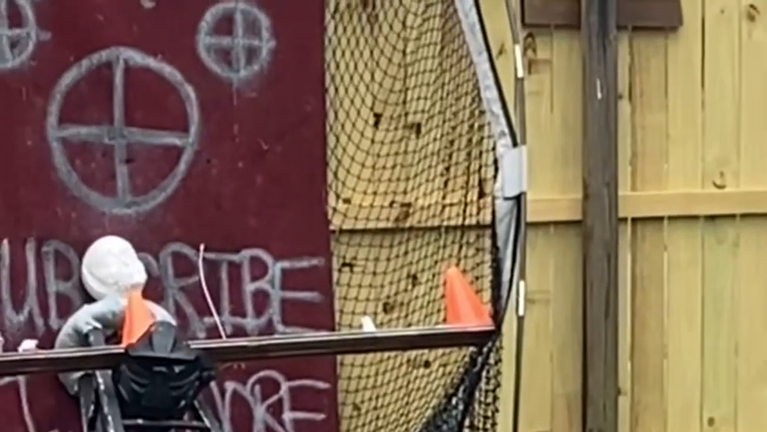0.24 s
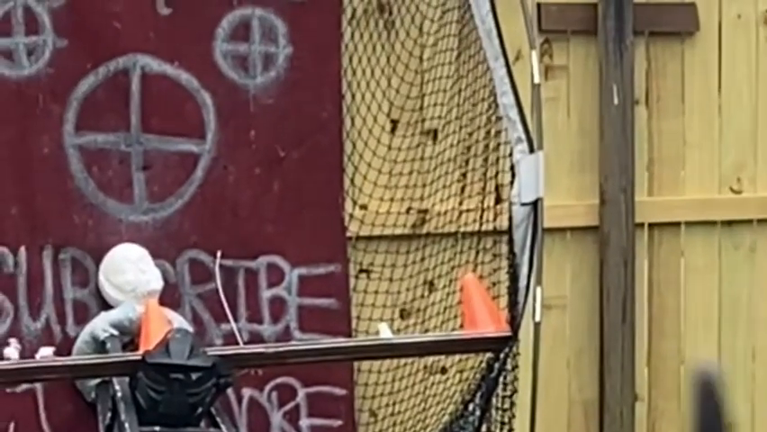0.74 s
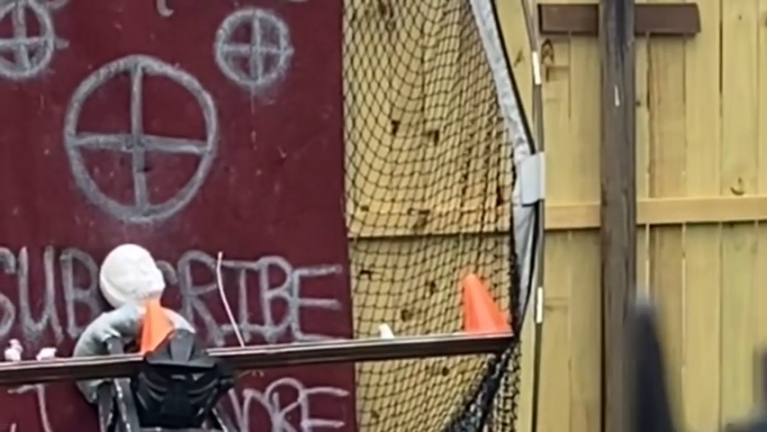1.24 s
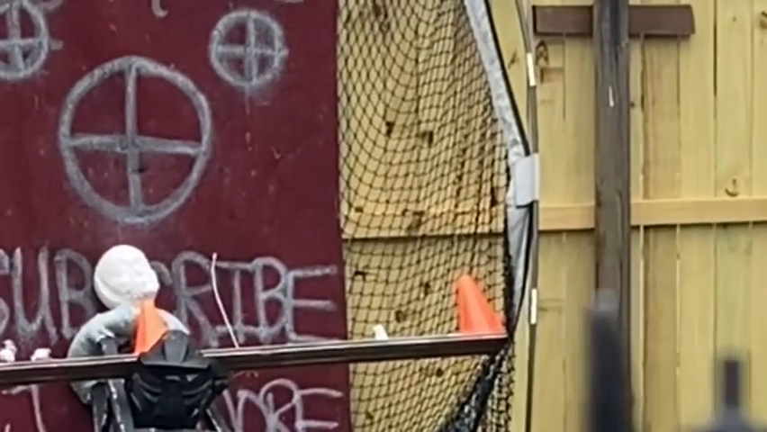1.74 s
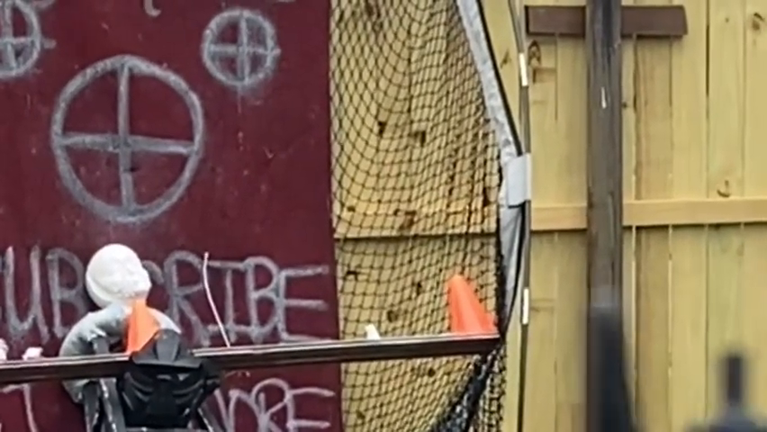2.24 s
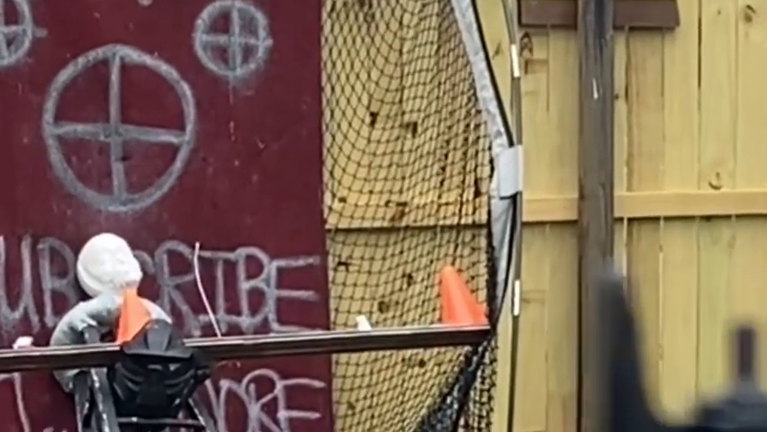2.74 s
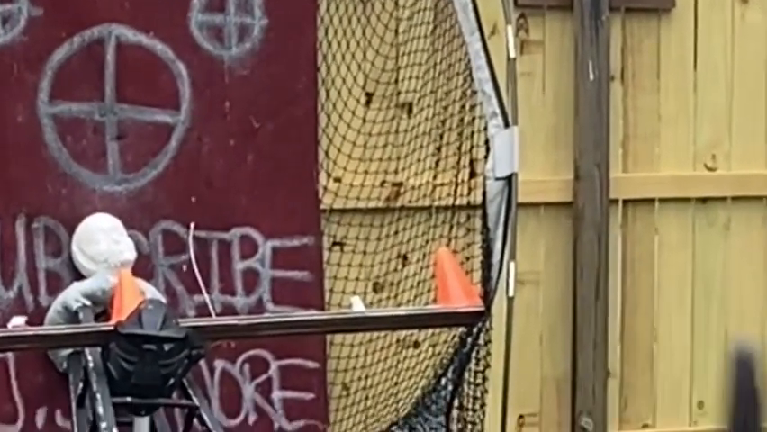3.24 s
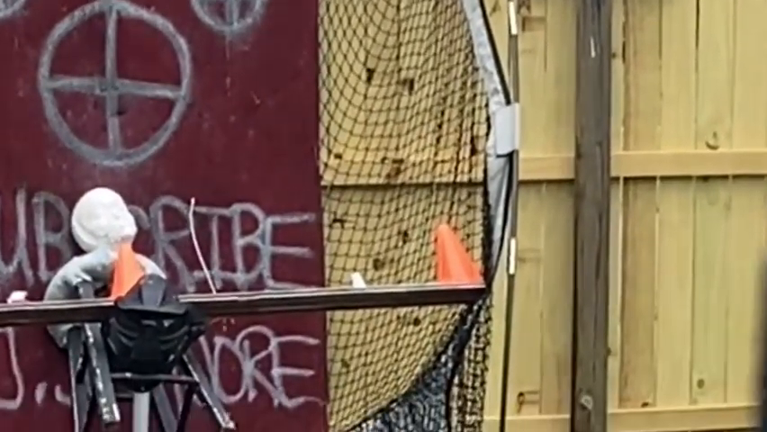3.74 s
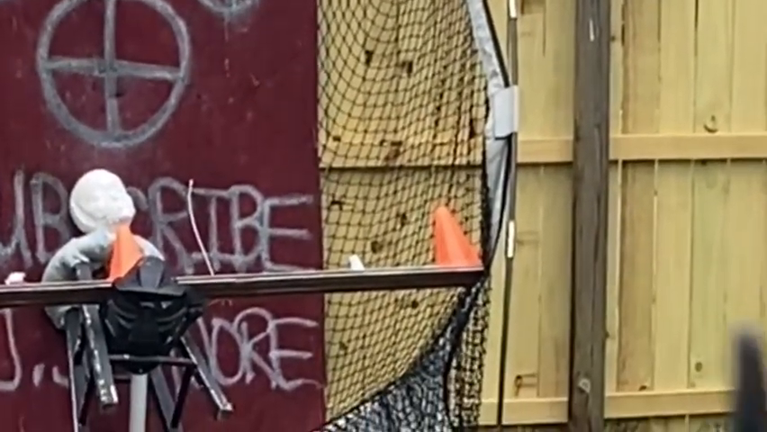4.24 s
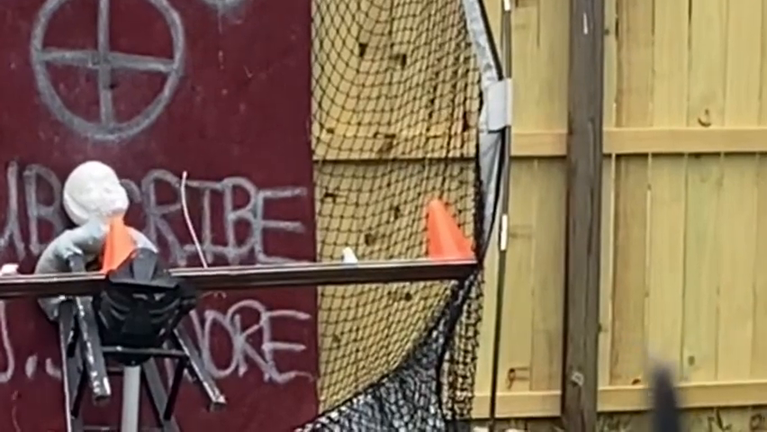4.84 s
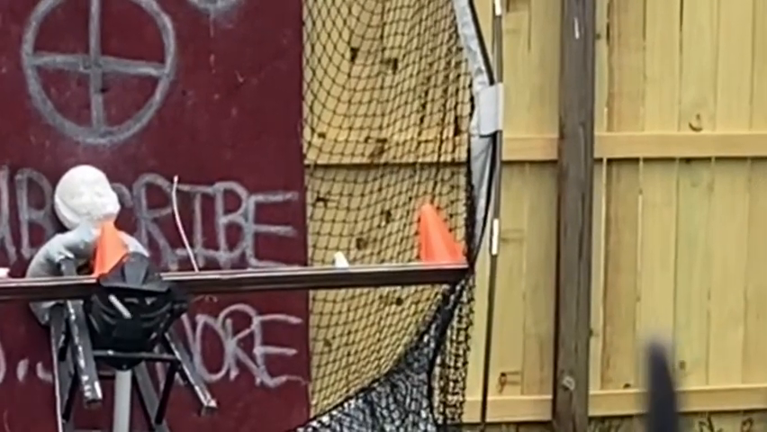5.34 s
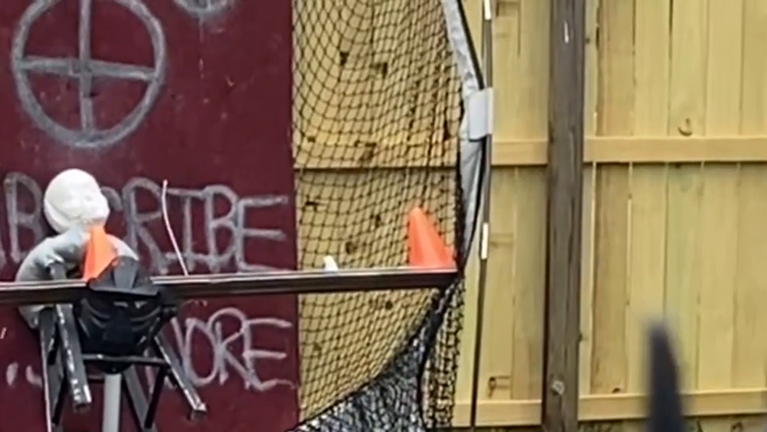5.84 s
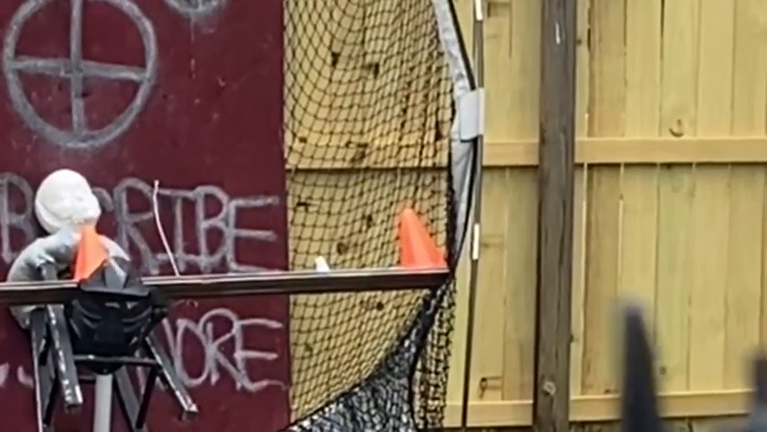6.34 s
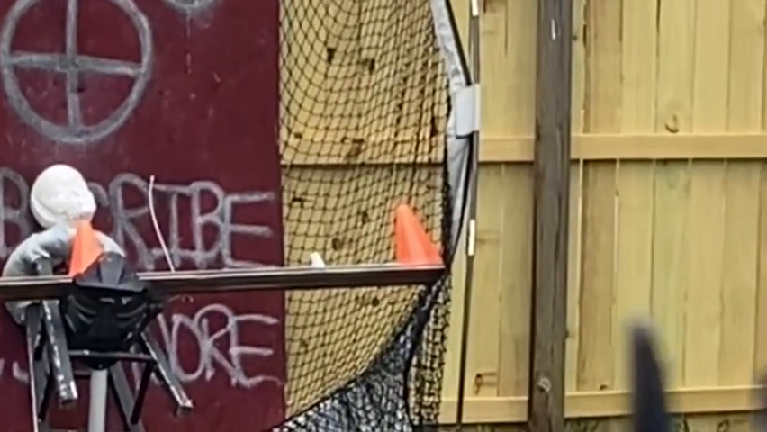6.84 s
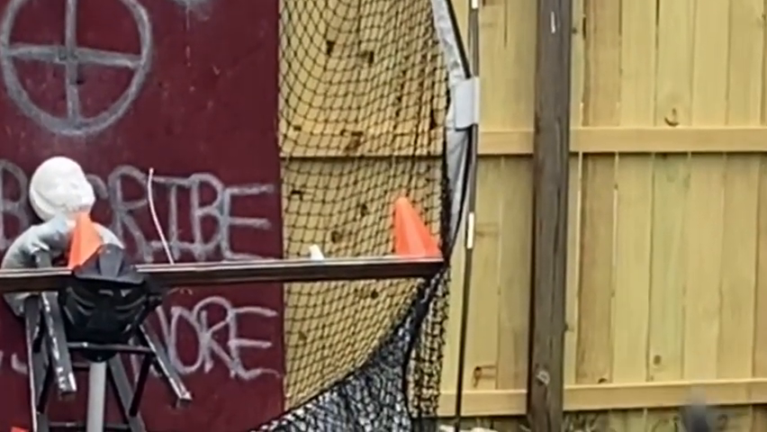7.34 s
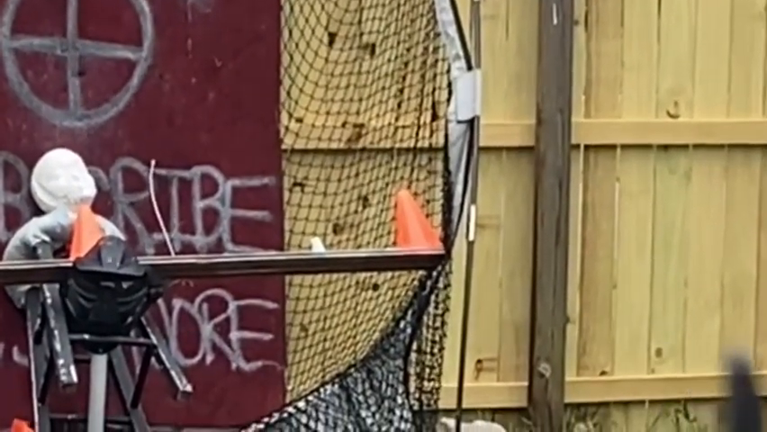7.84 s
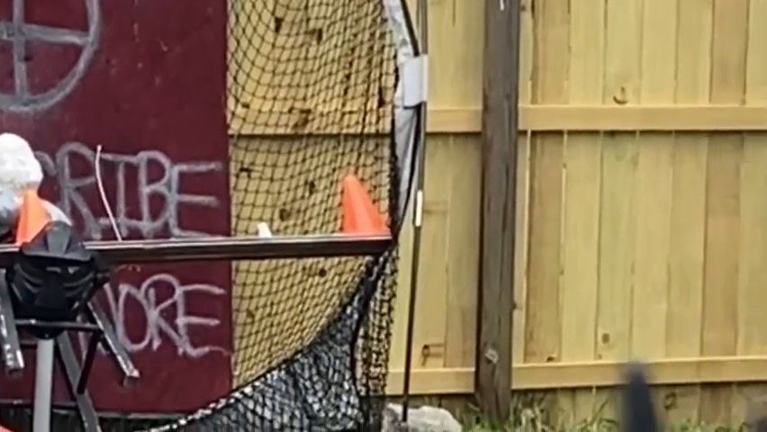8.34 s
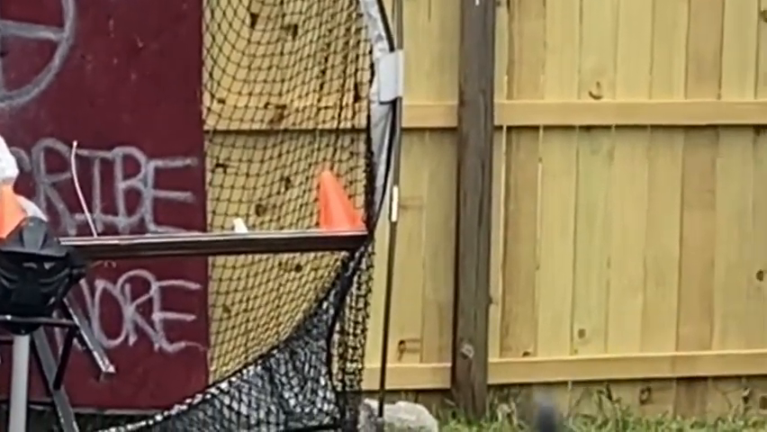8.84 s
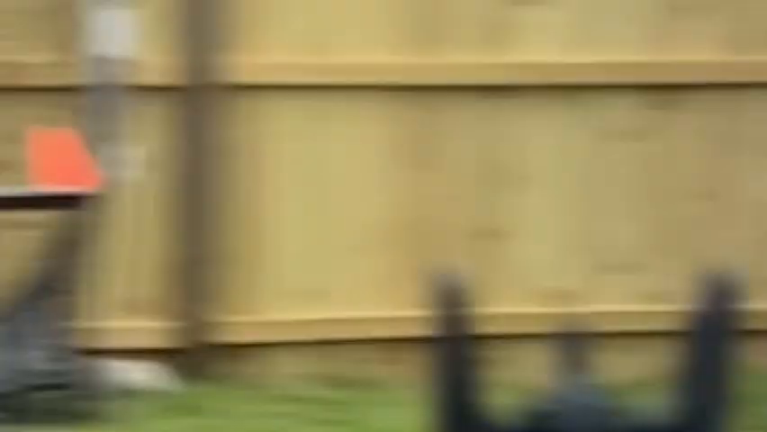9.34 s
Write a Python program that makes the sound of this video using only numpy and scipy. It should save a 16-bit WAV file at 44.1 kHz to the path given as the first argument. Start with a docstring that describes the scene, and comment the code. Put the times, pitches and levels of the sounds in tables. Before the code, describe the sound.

In a fenced backyard, an electric airsoft rifle fires close to a stereo microphone. Six evenly spaced single shots come first, each a short rasping gear whine, hard hollow clack and airy puff, followed by a pellet smack and small bounces. After a pause come three rapid bursts, then four more singles. Trigger clicks and faint handling rustles fill gaps over a barely audible traffic rumble.

```python
"""A town rumbles faintly under rustles and sparse ticks; then an electric airsoft rifle fires close by in a fenced yard.
It fires single shots and three short bursts. A motor spins up a whining, rasping gearbox, made of tones and noise;
on each turn of the gears the spring shoves the body, the piston knocks and the muzzle puffs.
Each pellet smacks the far backstop and bounces twice; these and the trigger clicks are short noisy taps on plastic.
Reflections and two diffuse tails of noise make the yard's echo, heard by a pair of microphones."""
import sys
import numpy as np
from scipy import signal
from scipy.fft import rfft, irfft
from scipy.io import wavfile
from scipy.ndimage import uniform_filter1d

SR = 44100
rng = np.random.default_rng(int(sys.argv[2]) if len(sys.argv) > 2 else 0)


def generate_wav(signal):
    """Clip the signal to [-1, 1] and save it as 16-bit WAV at the path in sys.argv[1]."""
    frames = np.transpose(np.atleast_2d(signal))
    scaled = np.clip(frames, -1, 1) * 32767
    pcm = np.round(scaled).astype(np.int16)
    wavfile.write(sys.argv[1], SR, pcm)


N = 422478
TIME = np.arange(N) / SR  # seconds

# Distant town, its tone colour. Each row: frequency in Hz, relative level in dB.
TOWN_SPECTRUM = [(20, -30.5), (45, -5), (70, 4), (120, 2), (220, -9.5), (400, -12.5), (550, -12.5),
                 (1000, -26.5), (1600, -38.5), (2400, -35), (4000, -45.5), (7000, -43.5), (10000, -58),
                 (16000, -56)]
# Times when the town swells. Each row: loudest moment in seconds, half-width in seconds, dB added.
TOWN_SWELLS = [(.3, 0.96, 6), (2.4, 0.89, 9), (4.75, 0.6, 9)]
TOWN_DB = -71  # before the swells are added
THUD_S = 4.70  # start of the low thud

# Louder rustles as the hands shift on the rifle. Each row: start in seconds, length in seconds, level in dB.
HAND_SHIFTS = [(0, 0.7, -83.5), (3.621, .16, -71), (3.901, .4, -82), (7.49, 0.034, -80.5),
               (8.269, .13, -66)]
FAINT_TICKS_DB = -93.5  # steady level of sparse, very faint random ticks between the louder rustles
# Trigger springing back and loose parts clicking.
# Each row: start in seconds, level in dB before a shared boost, treble tilt in dB per octave, decay in seconds.
TRIGGER_CLICKS = [(.859, -29.5, -8, .004), (.874, -23, .5, .0038), (1.282, -24.5, 1, .0023),
                  (1.451, -41.5, 2.5, .003), (1.485, -49, 3, .0022), (1.677, -25.5, 0.5, .0021),
                  (2.063, -28.5, 0.5, .003), (2.463, -20, 0, .0015), (2.798, -24.5, -2.5, .0035),
                  (3.791, -31, -1, .004), (4.792, -26, 1, .003), (6.425, -41.5, 2.5, .006),
                  (6.912, -38.5, -1, .004), (7.117, -39, 0.5, .0045), (8.259, -42, 2, .006),
                  (8.303, -23.5, 2.5, .0019), (8.644, -23, 2, .0018), (9.002, -27.5, -5, .008),
                  (9.351, -23, 2, .0021)]
# Tone colour of the trigger clicks, ticks and rustles. Each row: frequency in Hz, relative level in dB.
TRIGGER_SPECTRUM = [(150, -30), (700, -4.5), (1000, -4.5), (1800, 2.5), (2700, 3), (3800, 3), (7000, 0),
                    (16000, -2.5)]
CLOSE_ECHO = 0.48  # share (0-1) of the yard's echo carried by the clicks, ticks and rustles

# First pellet of each pull hitting the backstop. Each row: start in seconds, level in dB before SMACK_DB.
BACKSTOP_HITS = [(.842, -25), (1.2375, -33), (1.643, -27), (2.047, -23), (2.399, -26), (2.767, -23),
                 (4.511, -22), (5.263, -39), (6.167, -30), (7.739, -46), (8.602, -24.5), (8.974, -22.5),
                 (9.337, -23)]
# The same pellet coming down after it rebounds. Each row: start in seconds, level in dB before the bounce's own.
PELLET_LANDINGS = [(.929, -30), (1.349, -34.5), (1.751, -27), (2.149, -30.5), (2.506, -24), (2.874, -32),
                   (4.608, -30), (5.364, -37), (6.273, -37.5), (7.832, -28.5), (8.692, -33), (9.071, -38),
                   (9.422, -40)]
# The two bounces. Each row: dB added to the landing, treble tilt in dB per octave, decay in seconds.
PELLET_BOUNCES = [(11.5, 0.5, 0.0041), (-7.5, 1.5, .003)]
# Tone colour of a pellet's impact. Each row: frequency in Hz, relative level in dB.
PELLET_SPECTRUM = [(40, -63), (150, -26), (550, -5), (900, -5.5), (2200, -2), (3000, -1.5), (5500, -4.5),
                   (9000, -11), (16000, -24.5)]
SMACK_DB, SMACK_TILT_DB, SMACK_DECAY_S = 13.5, -2, 0.011  # tilt is per octave
BOUNCE_S = .095  # from the first bounce to the second

# Trigger pulls; a held trigger fires a burst.
# Each row: first shot in seconds, seconds of cocking before it, seconds the motor stays on after it,
# then relative levels in dB: gear whine, gear rasp, muzzle puff, tick of the gear first letting the piston go.
TRIGGER_PULLS = [(.748, .053, 0, 0, 0.5, -.5, -2), (1.1616, .0525, 0, 1.5, 0, -0.5, 4.5),
                 (1.566, .052, 0.0007, -0.5, -1, 0, -8.5), (1.9614, .0525, 0, -1, -.5, -0.85, 1),
                 (2.3217, .053, 0.0015, -1, 0, -1, -3), (2.687, .053, 0.0012, -1, 0.5, -0.5, -3),
                 (4.4256, .054, 0.25, -2, -1, -.5, -20.5), (5.1785, .0395, 0.34, -2, -1, -.5, -12.5),
                 (6.085, .059, .175, -5, -1.5, -0.8, -19), (7.654, .062, 0.004, -9, -3.5, -4.5, -6.5),
                 (8.5124, .0455, 0.0011, -9, -2.5, -3, -7), (8.8899, .055, 0.0017, -7, -2.5, -2.5, -13.5),
                 (9.2451, .053, 0.0038, -6, 1, -1.5, -2)]
# Tone colour of the scraping gears. Each row: frequency in Hz, relative level in dB.
RASP_SPECTRUM = [(100, -37.5), (330, -32), (600, -6.5), (900, -15), (1700, -7), (2300, -6), (2800, -5.5),
                 (3500, -3.5), (4400, -5.5), (5800, -7), (8000, -11), (16000, -17)]
# How well the gearbox shell radiates the tooth tones. Each row: frequency in Hz, gain in dB.
WHINE_GAIN = [(300, -25), (700, -8.5), (1100, -16.5), (1650, -3), (2200, -1), (2850, -5), (3350, 1.5),
              (4000, -14), (5800, -9.5), (8000, -16.5), (16000, -28.5)]
CYCLE_S = .0493  # one turn of the gears at full speed, one shot
START_LAG_S, SPIN_UP_S = .0305, .035  # a turn takes longer while the motor is still gaining speed
COAST_REACH_S, COAST_DRAG = .04, .24  # without power: how far the gears can still turn, and the share they slow by
FREE_S, FREE_COASTING_S = .009, .018  # after a shot the gears spin free this long before they catch the piston
FREE_DB, CATCH_DB, CATCH_DECAY_S = -4.5, 7, 0.0069  # the rasp drops meanwhile, and flares at the catch

# Heavily damped ringing of the cylinder when the piston lands.
# Each row: frequency in Hz, relative level in dB, seconds to the crest.
CYLINDER_MODES = [(900, -28, .001), (1157, -20, .0016), (1480, -33.5, .003), (1950, -19, .0011),
                  (2279, -2.5, 0.0009454), (2446, -9.5, 0.0012043), (3440, -21.5, .0006),
                  (4900, -11, .0007), (5735, -16, .0006)]
# Crack that rides on the knock. Each row: frequency in Hz, relative level in dB.
CRACK_SPECTRUM = [(200, -10.5), (550, 5.5), (1100, 1), (2300, -8), (3600, -1), (6000, -2), (8000, -5),
                  (16000, -8.5)]
SLAM_DB, SLAM_SPREAD_DB = 0.4, .5  # the piston lands nearly alike every time
REFILL_DB = -3.5  # later shots of a burst puff less, as the cylinder has less time to refill
# Hollow plastic body of the rifle. Each row: centre in Hz, width in Hz, dB added or taken away.
BODY_RESONANCES = [(333, 170, 3.5), (670, 180, 0), (800, 30, -1.5), (900, 88, 3), (1125, 81, 5),
                   (1300, 82, -3), (2380, 410, 4.5), (2780, 170, -7), (2890, 80, 4)]

# Separate reflections from the shooter, ground and fence. Each row: delay in seconds, level in dB.
REFLECTIONS = [(.0032, -14), (.0049, -21.5), (.0092, -28), (0.0181, -18), (0.0345, -30.5), (.054, -32.5)]
# Diffuse echo. Each row: frequency in Hz, near walls in dB, far yard in dB,
# seconds for the far yard to fade by 60 dB.
YARD_ECHO = [(80, -27.5, -39, 0.38), (302, -30, -37, 0.39), (700, -14, -23.5, 0.87), (1310, -14, -31.5, 1),
             (2320, -19, -28, 0.62), (3890, -19, -25.5, 0.65), (6000, -13, -26, 0.91),
             (9900, -11, -22, 0.31), (16000, -19, -38, .2)]
# Timing between the two microphones. Each row: frequency in Hz, radians by which left leads.
MIC_LEAD = [(100, -.11), (400, -.3), (950, -.9), (1450, .2), (2000, .5), (2600, 1.15), (3200, .55),
            (3900, .3), (4500, 1.1), (4900, 3.2), (5300, 6.2), (8000, 7.8), (11000, 8.7), (12500, 9.15)]
# Loudness between the two microphones. Each row: frequency in Hz, left minus right in dB.
MIC_BALANCE = [(60, 0.0), (110, -1), (200, -0.5), (380, -1.0), (700, -1.5), (1290, -3.5), (2380, 0.5),
               (4400, 0.5), (8120, 0.0), (15000, 0.0)]
CUTOFF_HZ = 16100  # top of the recorded band


def amp(db):
    """Turns decibels into gain."""
    return 10 ** (np.asarray(db) / 20)


def unit(x):
    """Scales a sound to an rms level of 1."""
    return x / np.sqrt(np.mean(x ** 2) + 1e-20)


def read(points, hz, axis=1):
    """Reads one column of a table, filling in between rows on a log-frequency axis."""
    table = np.transpose(points)
    return np.interp(np.log(hz + 1), np.log(table[0] + 1), table[axis])


def add(mix, s, sound):
    """Mixes a sound in at time s (seconds)."""
    part = mix[max(round(s * SR), 0):][:len(sound)]
    part += sound[:len(part)]


def noise(spectrum, size):
    """Makes noise of rms 1 with the given tone colour."""
    gain = amp(read(spectrum, np.fft.rfftfreq(size, 1 / SR)))
    return unit(irfft(rfft(rng.standard_normal(size)) * gain, size))


def ring(spectrum, tilt_db=0, size=2048):
    """Response of a body to one blow, with energy 1; it sounds only after the blow."""
    hz = abs(np.fft.fftfreq(size, 1 / SR))
    log_gain = np.log(amp(read(spectrum, hz) + tilt_db * np.log2(hz + 800)))
    response = np.fft.ifft(np.exp(signal.hilbert(log_gain).conj())).real
    return response / np.linalg.norm(response)


def chatter(decay, rise=0.00032, size=2048):
    """A train of tiny random contacts that builds and dies, with energy 1."""
    t = np.arange(size) / SR
    envelope = np.exp(-t / max(decay, 1 / SR)) * (1 - np.exp(-(t / rise) ** 2))
    burst = rng.standard_normal(size) * envelope
    return burst / np.linalg.norm(burst)


def tap(spectrum, tilt_db, decay):
    """A small plastic impact: a short chatter heard through the struck body."""
    return signal.fftconvolve(chatter(decay), ring(spectrum, tilt_db))


def town(apart=0.37):
    """Distant traffic rumble, swelling slowly and nearly alike in both ears."""
    swells_db = sum(db * np.exp(-((TIME - s) / width) ** 2) for s, width, db in TOWN_SWELLS)
    shared = noise(TOWN_SPECTRUM, N)
    ears = np.array([shared + apart * noise(TOWN_SPECTRUM, N) for _ in range(2)])
    return amp(TOWN_DB + swells_db) * ears


def bump(thud_hz=48, thud_db=-51):
    """A soft low thud as the first burst stops: one low tone that rises and dies."""
    out, t = np.zeros(N), np.arange(SR // 3) / SR
    age = t / .028  # 1 at the crest of the envelope
    add(out, THUD_S, amp(thud_db) * age * np.exp(1 - age) * np.sin(2 * np.pi * thud_hz * t))
    return out


def ticks_and_rustles(per_s=26, grain_decay=0.0069, count=6):
    """Sparse, very faint random ticks at a steady level, raised to louder rustles while the hands shift."""
    moments = (rng.random((count, N)) < per_s / count / SR) * rng.uniform(0.27, 1, (count, N))
    grains = np.array([tap(TRIGGER_SPECTRUM, tilt_db=-1.5, decay=grain_decay) for _ in range(count)])
    ticks = unit(signal.oaconvolve(moments, grains, axes=1).sum(0)[:N])
    shifts = sum(amp(db) * ((TIME > s) & (TIME < s + length)) for s, length, db in HAND_SHIFTS)
    return (amp(FAINT_TICKS_DB) + uniform_filter1d(shifts, size=800)) * ticks


def clicks(level_db=14):
    """The trigger and loose parts tap the rifle's body."""
    out = np.zeros(N)
    for s, db, tilt_db, decay in TRIGGER_CLICKS:
        add(out, s, amp(level_db + db) * tap(TRIGGER_SPECTRUM, tilt_db, decay))
    return out


def shot_times(first, cocking, held):
    """The gears fire once a turn while the motor runs, and once more if they can coast that far."""
    shots = [0]
    while True:
        lag = START_LAG_S * np.exp(-(shots[-1] + cocking) / SPIN_UP_S)
        due = shots[-1] + CYCLE_S + lag
        if due - held > COAST_REACH_S:
            return first + np.array(shots)
        shots.append(due + COAST_DRAG * max(due - held, 0))


def pellets():
    """Every shot sends a pellet down the yard: a smack on the backstop, then two bounces."""
    out = np.zeros(N)
    for pull, (smack, smack_db), (landing, landing_db) in zip(TRIGGER_PULLS, BACKSTOP_HITS, PELLET_LANDINGS):
        _, cocking, held, *_ = pull
        for later in shot_times(0, cocking, held):
            hit = tap(PELLET_SPECTRUM, SMACK_TILT_DB, SMACK_DECAY_S)
            add(out, smack + later, amp(SMACK_DB + smack_db) * hit)
            for k, (db, tilt_db, decay) in enumerate(PELLET_BOUNCES):
                bounce = amp(landing_db + db) * tap(PELLET_SPECTRUM, tilt_db, decay)
                add(out, landing + later + k * BOUNCE_S, bounce)
    return out


def engagement(t, shots):
    """How hard the gears bear on the piston: they let go for each shot, then catch it again with a rattle."""
    db = np.zeros(len(t))
    for s in shots:
        catch = s + (FREE_S if s < shots[-1] else FREE_COASTING_S)
        db += FREE_DB * ((t > s - .005) & (t < catch))
        db += CATCH_DB * (t >= catch) * np.exp(-abs(t - catch) / CATCH_DECAY_S)
    return amp(uniform_filter1d(db, size=40))


def gearbox(shots, power_off, whine_db, rasp_db, mesh_hz=3700, spin_up=0.035, sag=0.25, coast=0.055,
            surge=2.0, surge_s=0.036, ease_s=.042, rough_db=2.5):
    """The motor spins up, sags as it cocks the spring for each shot (seconds after the pull), then coasts."""
    t = np.arange(0, shots[-1] + 0.26, 1 / SR)
    unpowered = np.maximum(t - power_off, 0)
    cycle = np.interp(t, np.r_[0, shots], np.arange(len(shots) + 1))
    spring = uniform_filter1d(cycle % 1, size=300).clip(0, 1)  # how far the spring is compressed
    speed = (1 - np.exp(-t / spin_up)) * (1 - sag * spring ** 1.4) * np.exp(-unpowered / coast)
    wobble = unit(uniform_filter1d(rng.standard_normal(len(t)), size=40))
    hz = mesh_hz * speed * (1 + .02 * wobble)  # gear teeth meeting per second
    mesh = 2 * np.pi * np.cumsum(hz) / SR

    # the teeth sing while they pull on the spring, hardest while the motor is still accelerating
    load = (0.14 + np.sin(np.pi * spring) ** 2) * (1 + 3.5 * np.exp(-(t / 0.052) ** 2))
    load *= np.exp(-np.maximum(t - shots[-1], 0) / 0.065)
    overtones_db = [-3.5, -9, -11.5, -17.5]
    whine = sum(amp(db + read(WHINE_GAIN, k * hz)) * np.sin(k * mesh) for k, db in enumerate(overtones_db, 1))

    # they scrape from the first instant, surge with the starting motor, and ease off once the power is cut
    force = (1 - 0.9 * np.exp(-(t / 0.026) ** 2)) * (1 + surge * np.exp(-(t / surge_s) ** 2))
    force *= np.exp(-(unpowered / ease_s) ** 1.5)
    knocks = amp(rough_db * unit(uniform_filter1d(rng.standard_normal(len(t)), size=90)))
    rasp = noise(RASP_SPECTRUM, len(t)) * (1 + 0.17 * np.cos(mesh)) * knocks
    return amp(whine_db - 30.5) * load * whine + amp(rasp_db - 35) * force * engagement(t, shots) * rasp


def recoil(shell_hz=358, shove_db=-21, width=0.0016, groan_hz=820, groan_db=-26):
    """The released spring groans, then shoves the hollow body just before the piston lands."""
    t = np.arange(1024) / SR - .0072  # zero at the middle of the shove
    shove = amp(shove_db) * np.exp(-(t / width) ** 2) * np.cos(2 * np.pi * shell_hz * t)
    groan = amp(groan_db) * np.exp(-((t + 0.0027) / width) ** 2) * np.cos(2 * np.pi * groan_hz * t)
    return shove + groan


def piston(knock_db=0.0, crack_db=-19.0, crack_crest=0.0011):
    """The piston head lands on its rubber pad: each mode swells briefly and dies; loose parts crack."""
    t = np.arange(1024) / SR

    def swell(crest):
        """Rises to 1 at the crest (seconds), then dies."""
        return (t / crest * np.exp(1 - t / crest)) ** 3.3

    knock = np.zeros(len(t))
    for hz, db, crest in CYLINDER_MODES:
        mode_hz = hz * rng.uniform(0.99, 1.01)
        knock += amp(db) * swell(crest) * np.cos(2 * np.pi * mode_hz * (t - crest))
    crack = noise(CRACK_SPECTRUM, len(t)) * np.sqrt(swell(crack_crest))
    return amp(knock_db) * knock + amp(crack_db) * crack


def muzzle(puff_db=-14.5, crest=.00556, spread=0.65, turns=1.124):
    """Air leaves the barrel as a thump whose pitch falls as the pressure spends itself."""
    age = np.log(np.arange(1, 3072) / SR / crest)  # log time, so the waves grow ever longer
    envelope = np.exp(-(age / spread) ** 2 / (1 + 0.5 * abs(age)))
    return -amp(puff_db) * envelope * np.cos(2 * np.pi * turns * age)


def shell(x):
    """The fixed resonances of the rifle's body colour all that it radiates."""
    hz = np.fft.rfftfreq(N, 1 / SR)
    colour_db = sum(db / (1 + (2 * (hz - centre) / width) ** 2) for centre, width, db in BODY_RESONANCES)
    cepstrum = irfft(np.log(amp(colour_db)), N)
    cepstrum[1:N // 2] *= 2  # folded forward in time, so that the body rings only after a blow
    cepstrum[N // 2 + 1:] = 0
    return irfft(rfft(x) * np.exp(rfft(cepstrum)), N)


def rifle(recoil_refill_db=-7, tick_tilt_db=-1.5):
    """Each pull runs the gearbox; each shot is a shove of the spring, a slam of the piston and a puff of air."""
    out = np.zeros(N)
    for first, cocking, held, whine_db, rasp_db, puff_db, tick_db in TRIGGER_PULLS:
        on, shots = first - cocking, shot_times(first, cocking, held)
        add(out, on, gearbox(shots - on, cocking + held, whine_db, rasp_db))
        add(out, first - .0082, amp(tick_db - 3) * tap(TRIGGER_SPECTRUM, tick_tilt_db, decay=.0015))
        for s in shots:
            later = s > first  # later shots of a burst shove and puff less
            add(out, s - .0095, amp(puff_db + recoil_refill_db * later) * recoil())
            add(out, s - .0005, amp(SLAM_DB + SLAM_SPREAD_DB * rng.standard_normal()) * piston())
            add(out, s, amp(puff_db + REFILL_DB * later) * muzzle())
    return shell(out)


def scatter(column, t60, delay, apart):
    """A diffuse tail for each microphone; each band fades by 60 dB in its own t60 (seconds)."""
    hz, t, (shared, own) = signal.stft(rng.standard_normal((2, SR)), SR, nperseg=256)
    # Each pair: frequency in Hz, how unlike the two microphones are.
    unlikeness = [(200, .3), (900, 0.98), (1800, 0.3), (5000, 1.4), (9000, 4.0), (13000, 0.66)]
    unlike = apart * read(unlikeness, hz)[:, None]
    pair = np.array([shared + unlike * own, shared - unlike * own]) / np.sqrt(1 + unlike ** 2)
    # sets each band's total energy, however long it lasts
    gain = amp(read(YARD_ECHO, hz, axis=column)) * np.sqrt(2 * np.log(1000) / (t60(hz) * SR))
    fade = amp(-60 * t / t60(hz)[:, None])
    tail = signal.istft(pair * fade * gain[:, None], SR, nperseg=256)[1]
    return np.pad(tail, ((0, 0), (round(delay * SR), 0)))[:, :SR]


def yard(x):
    """Direct sound, a few hard reflections, scatter from near walls and the long wash of the neighbourhood."""
    response = scatter(column=1, t60=lambda hz: 0.26 + 0 * hz, delay=.014, apart=0.93)
    response += scatter(column=2, t60=lambda hz: read(YARD_ECHO, hz, axis=3), delay=0.04, apart=0.42)
    mirrors = np.zeros(SR)
    for delay, db in REFLECTIONS:
        mirrors[round(delay * SR)] += amp(db)
    bass_cut = signal.butter(1, 700, "high", fs=SR, output="sos")  # bass bends round the reflecting surfaces
    response += signal.sosfilt(bass_cut, mirrors)
    response[:, 0] += 1  # the direct sound
    return signal.fftconvolve(x[None], response, axes=1)[:, :N]


def scene():
    """Everything heard in the yard, in two channels."""
    close = clicks() + ticks_and_rustles()
    echoing = yard(rifle() + pellets() + CLOSE_ECHO * close)
    return echoing + (1 - CLOSE_ECHO) * close + town() + bump()


def record(dry):
    """Two microphones hear each band out of step; the highest peaks are rounded off; then the band limit."""
    hz = np.fft.rfftfreq(N, 1 / SR)
    lead, louder_db = read(MIC_LEAD, hz), read(MIC_BALANCE, hz)
    # each microphone takes half of the difference
    timing = np.exp(.5j * np.array([lead, -lead]))
    balance = amp(np.array([louder_db, -louder_db]) / 2)
    pair = irfft(rfft(dry) * timing * balance, N)
    rounded = pair / (1 + (pair / .95) ** 8) ** (1 / 8)
    band_limit = signal.firwin(511, CUTOFF_HZ, window=("kaiser", 9), fs=SR)
    return signal.oaconvolve(rounded, band_limit[None], "same")


dry = scene()
out = record(dry)
generate_wav(out)
```